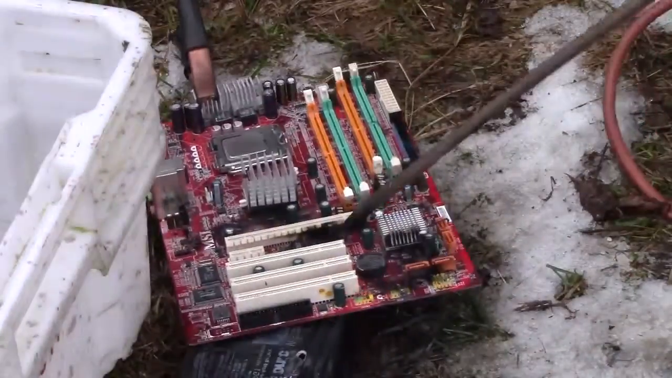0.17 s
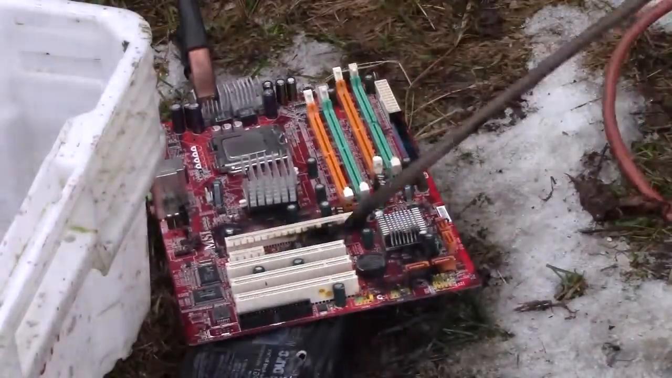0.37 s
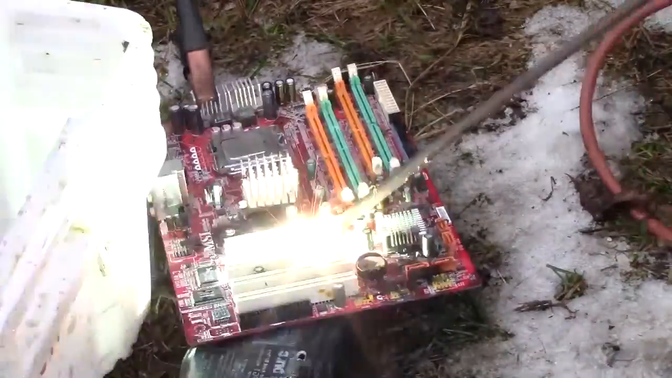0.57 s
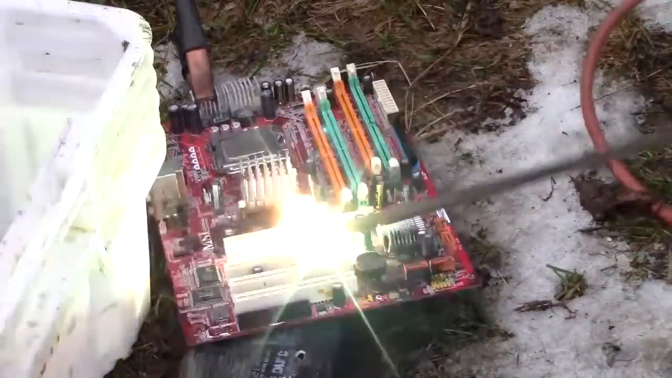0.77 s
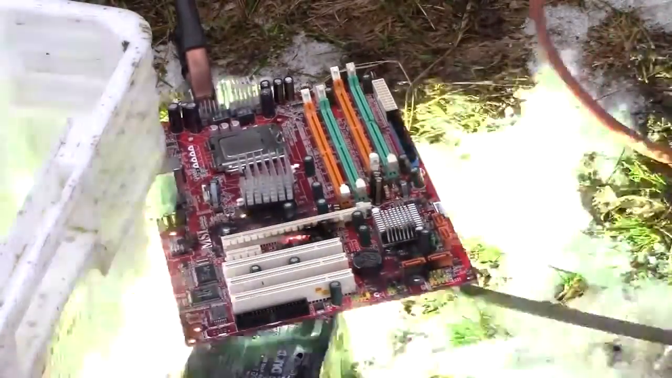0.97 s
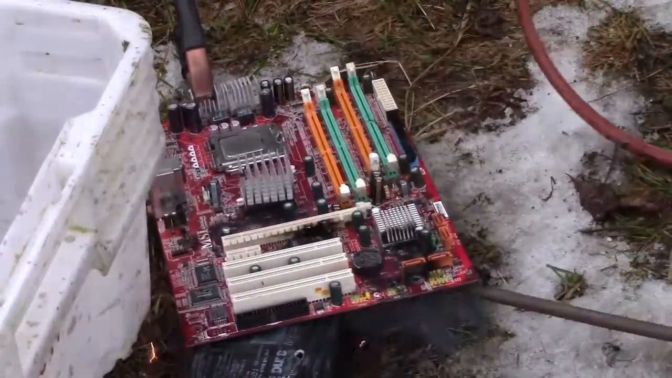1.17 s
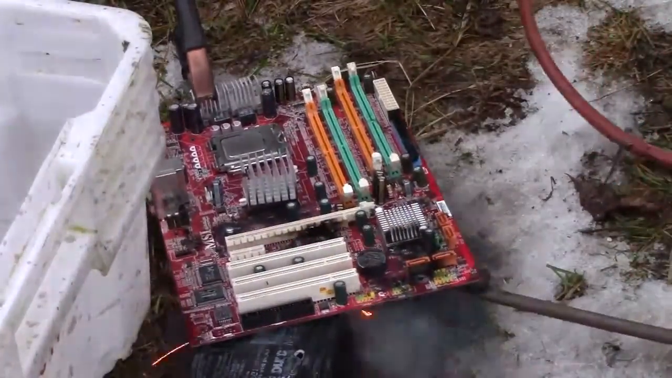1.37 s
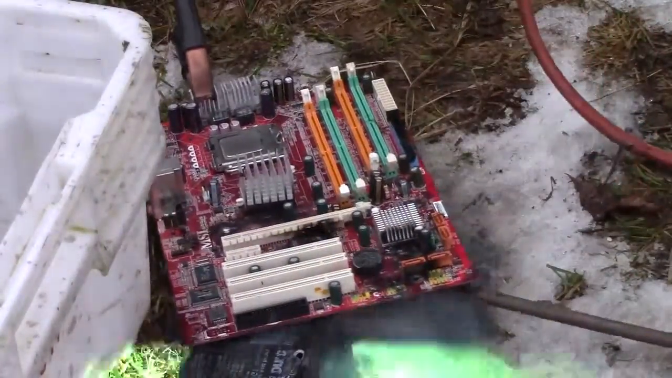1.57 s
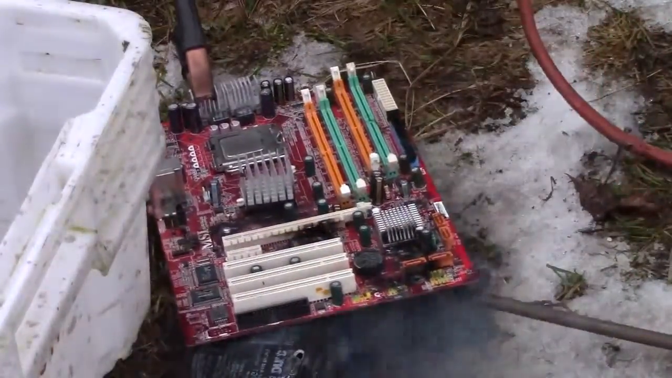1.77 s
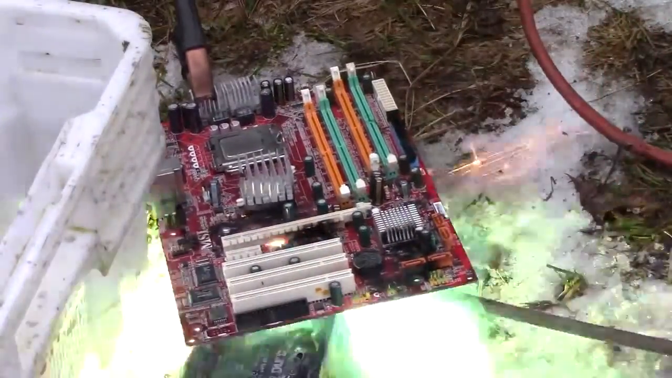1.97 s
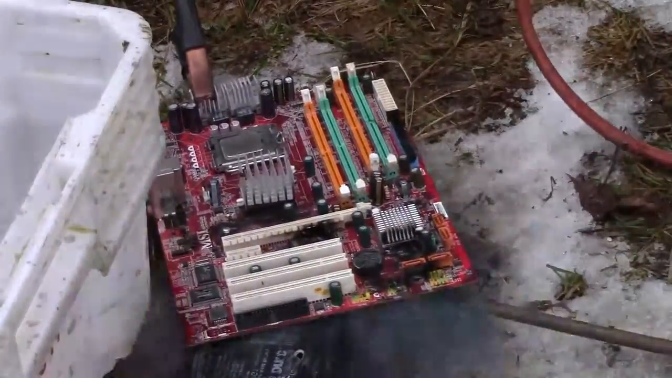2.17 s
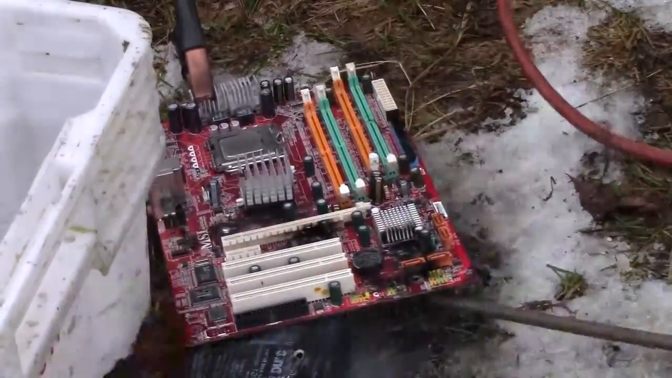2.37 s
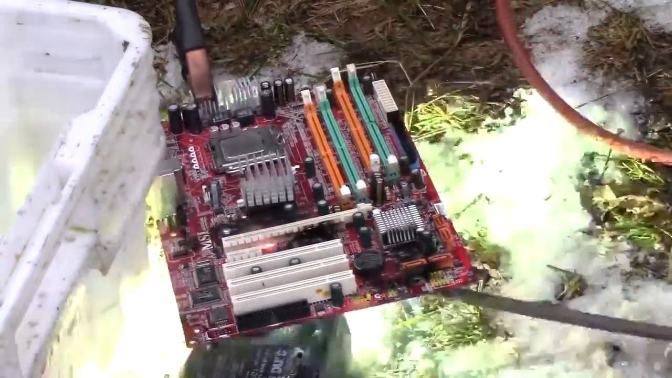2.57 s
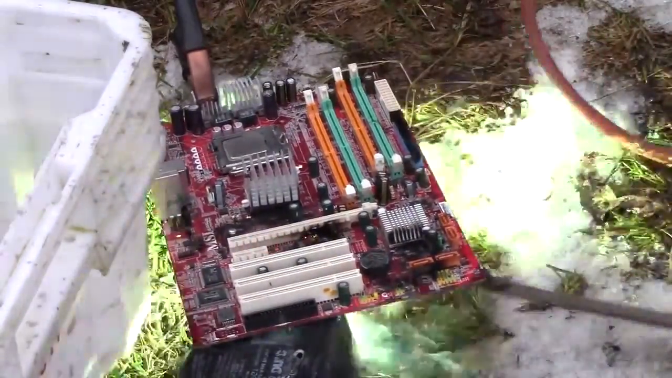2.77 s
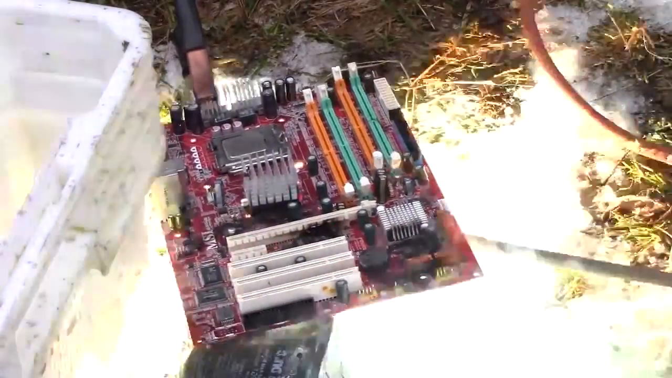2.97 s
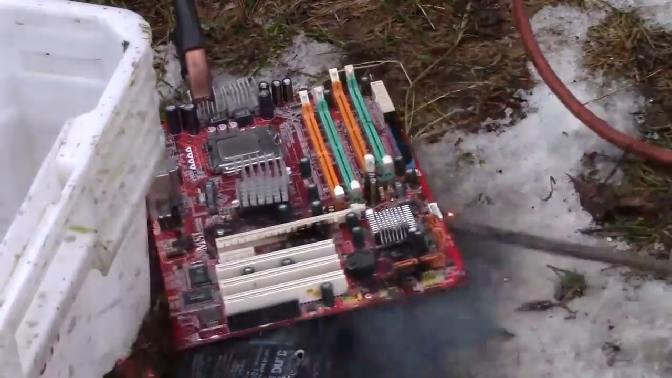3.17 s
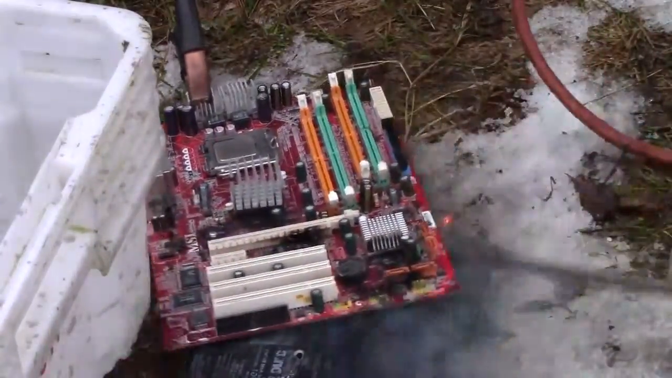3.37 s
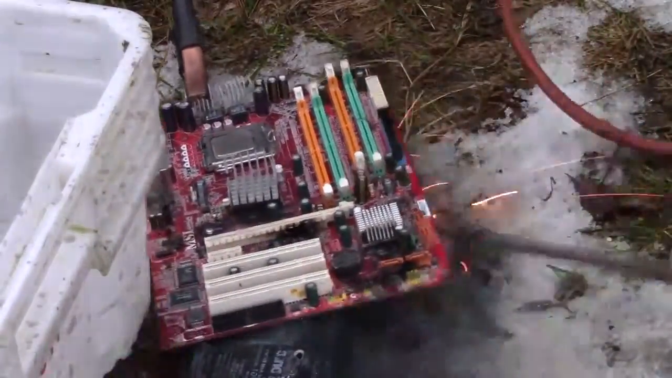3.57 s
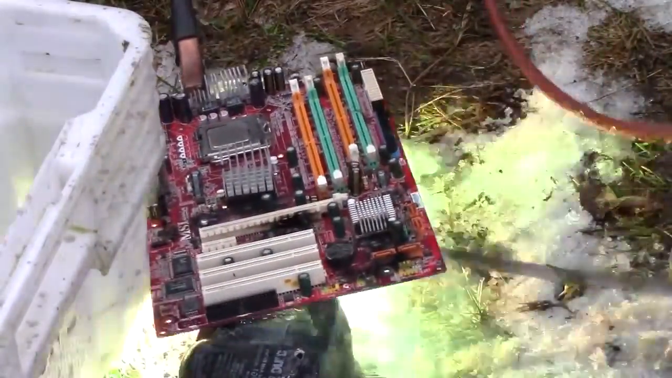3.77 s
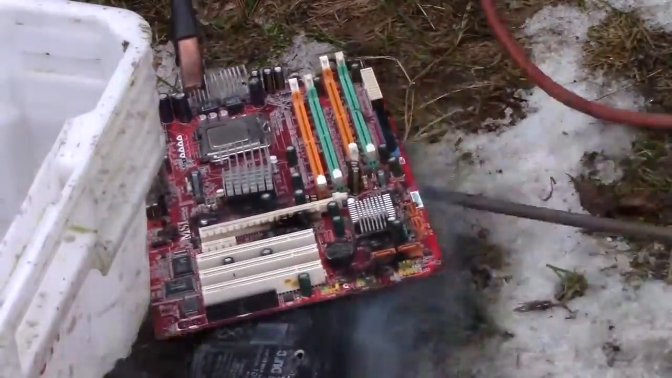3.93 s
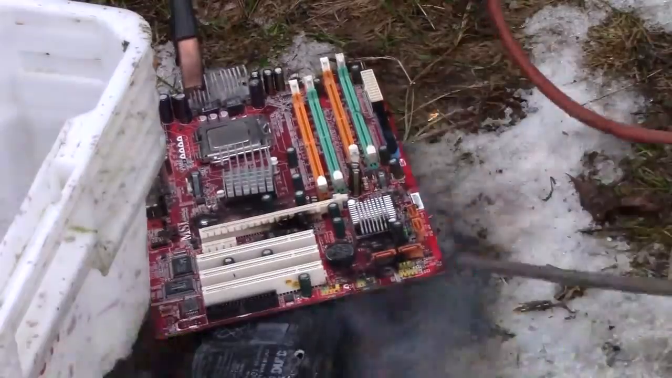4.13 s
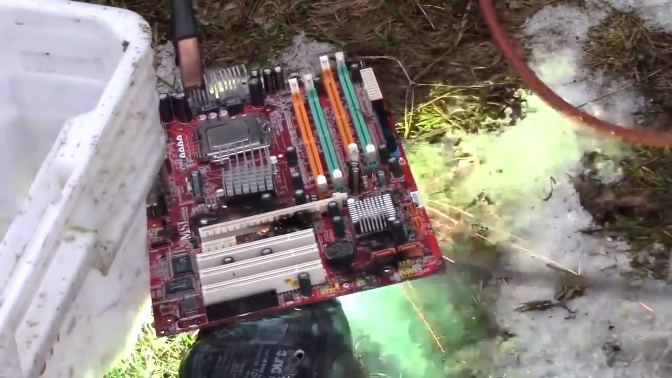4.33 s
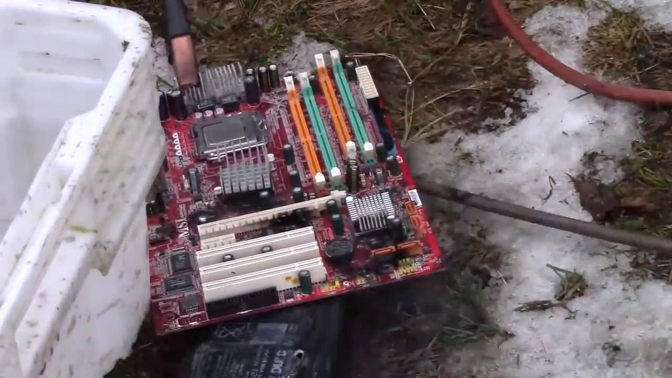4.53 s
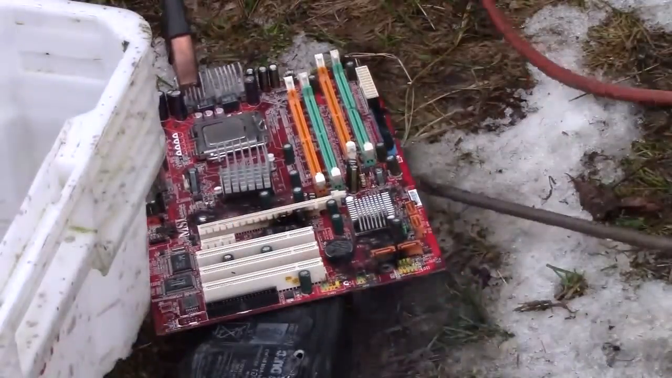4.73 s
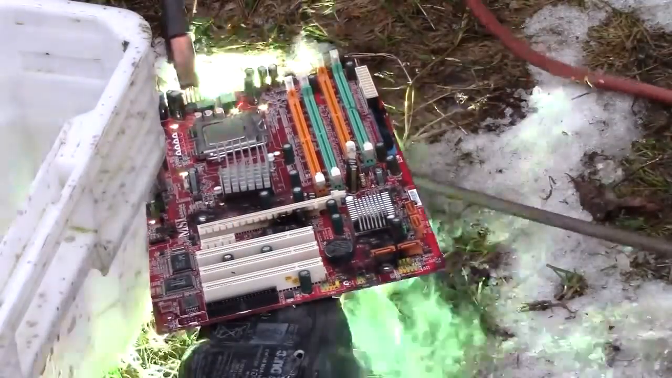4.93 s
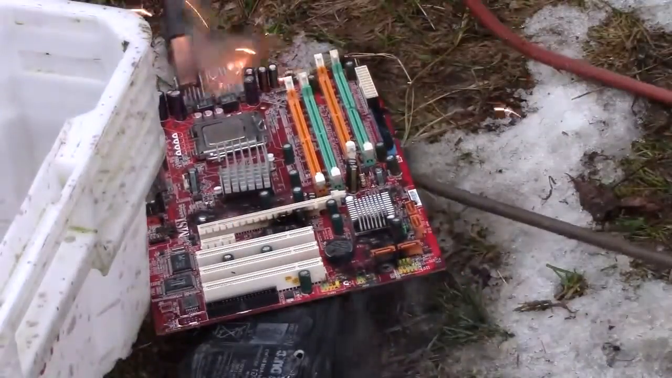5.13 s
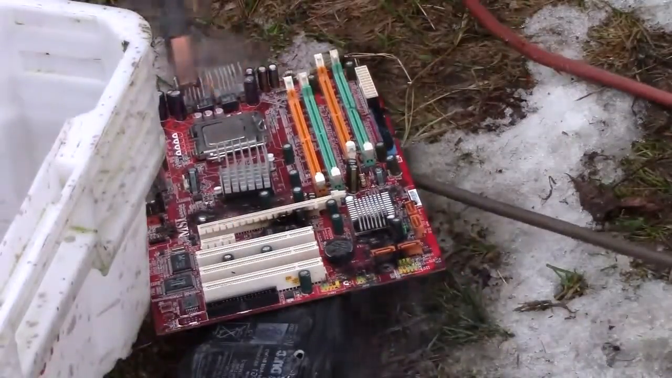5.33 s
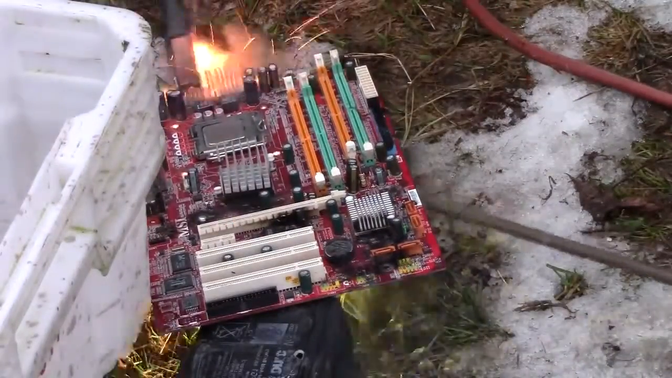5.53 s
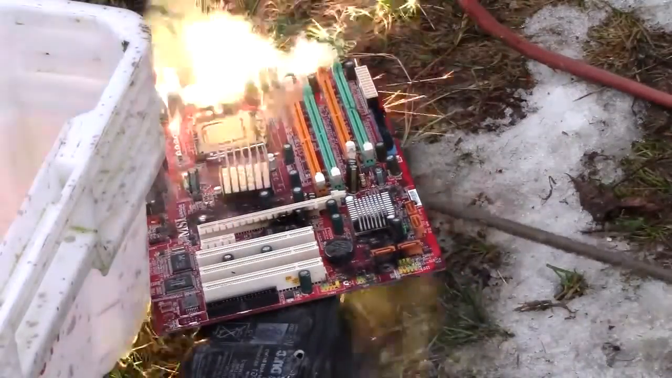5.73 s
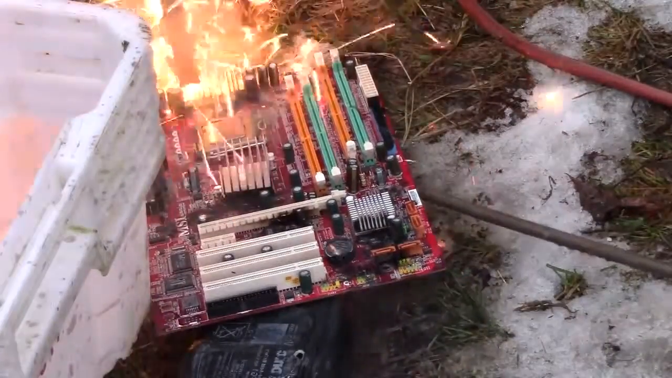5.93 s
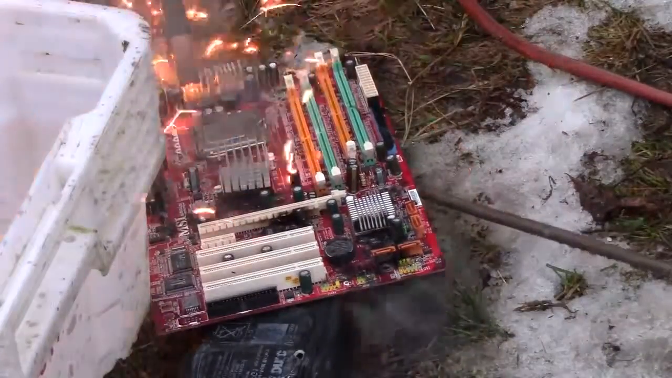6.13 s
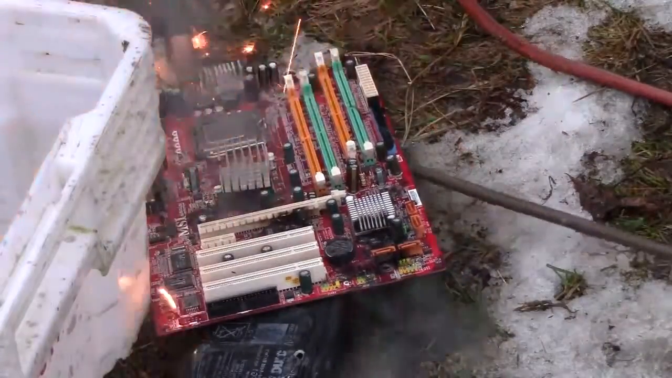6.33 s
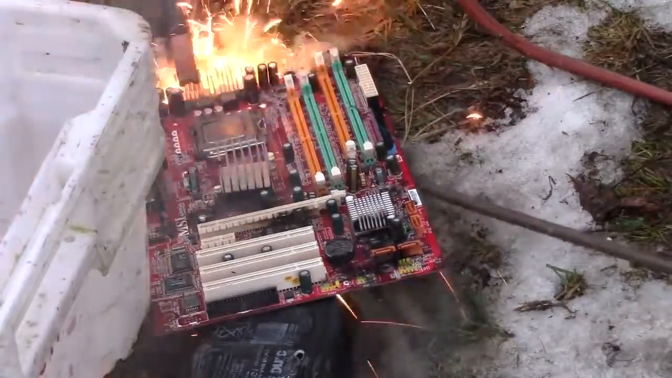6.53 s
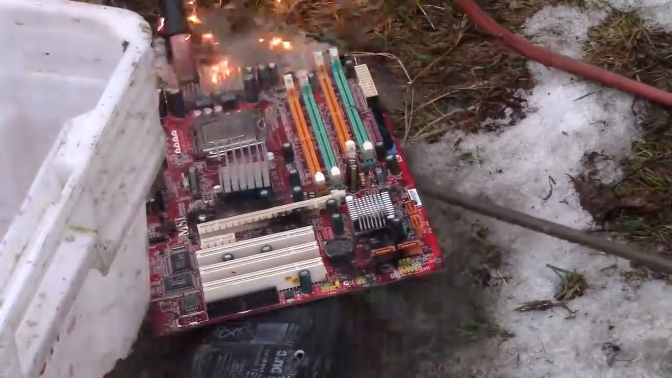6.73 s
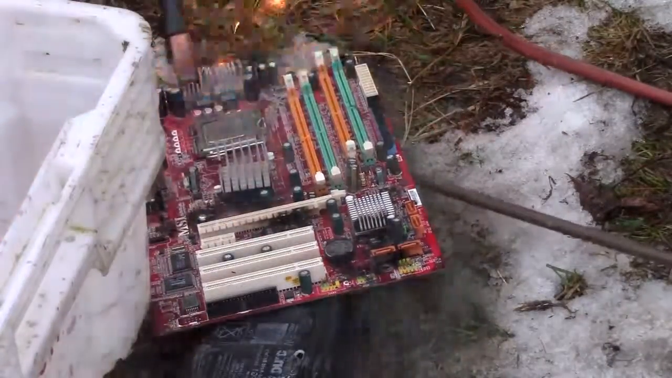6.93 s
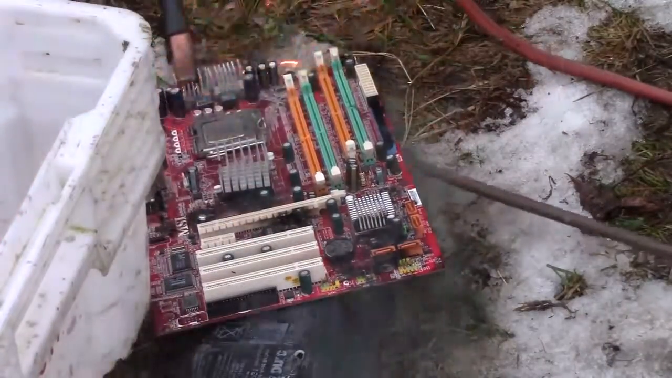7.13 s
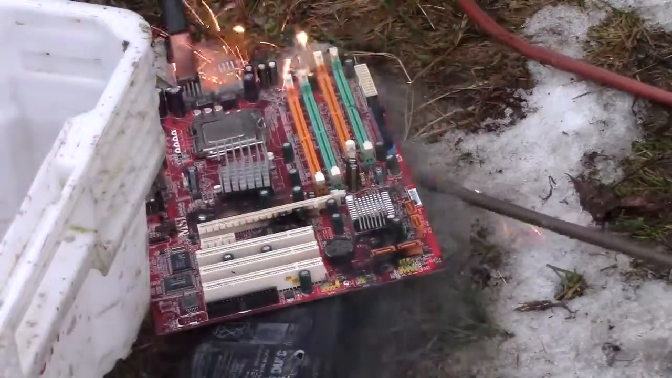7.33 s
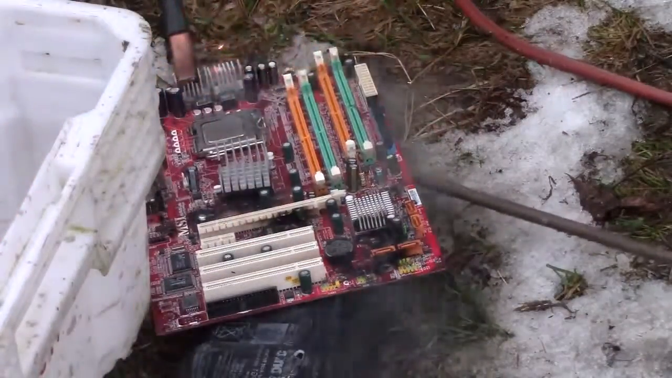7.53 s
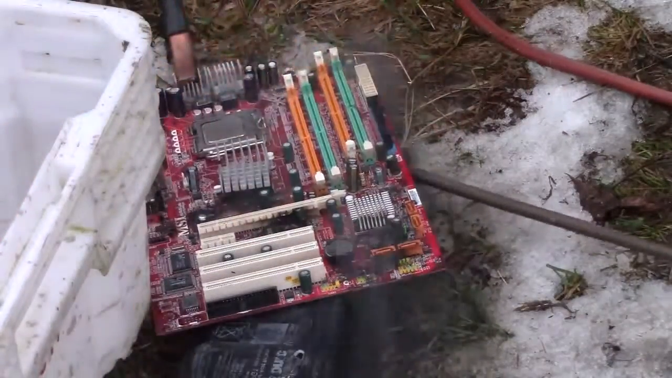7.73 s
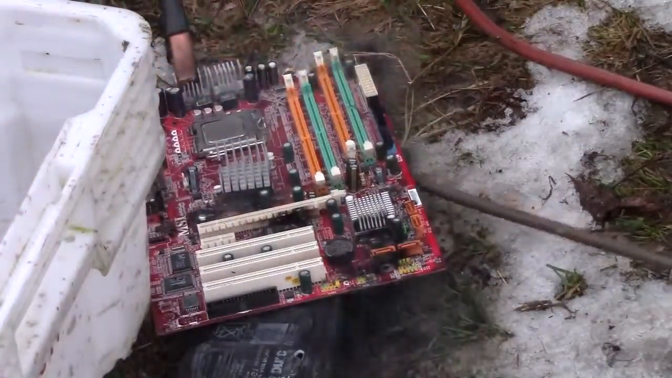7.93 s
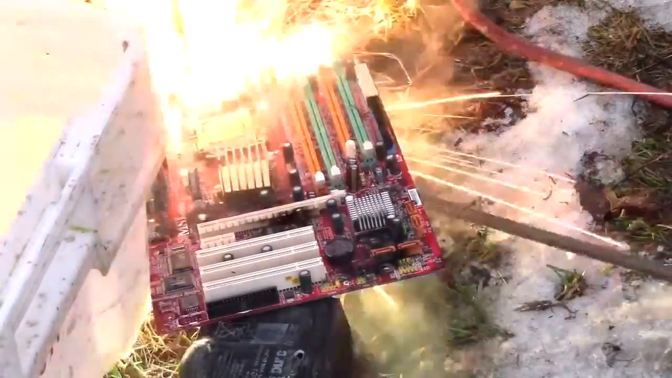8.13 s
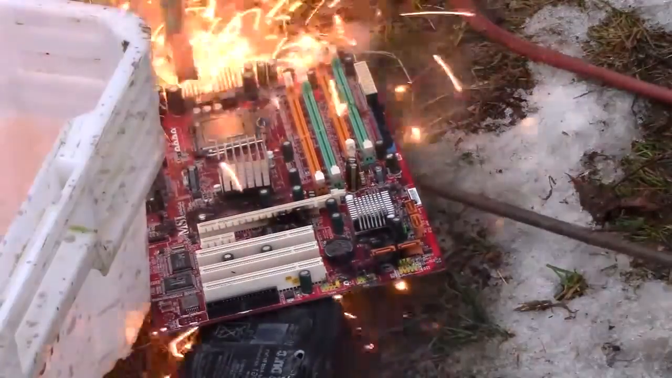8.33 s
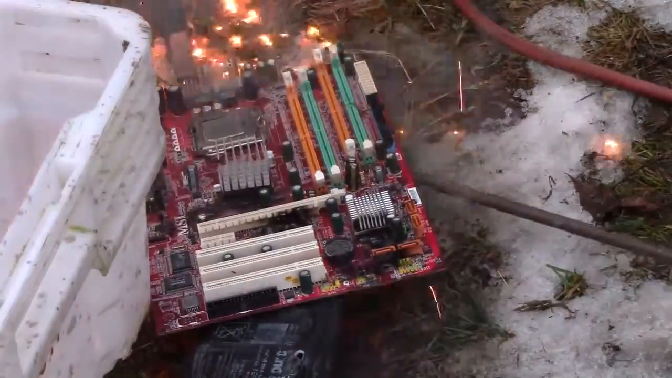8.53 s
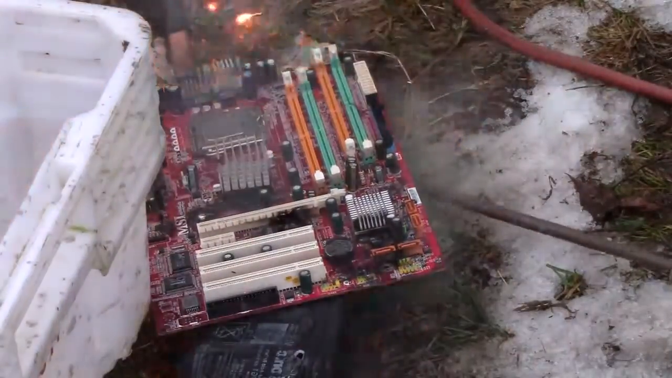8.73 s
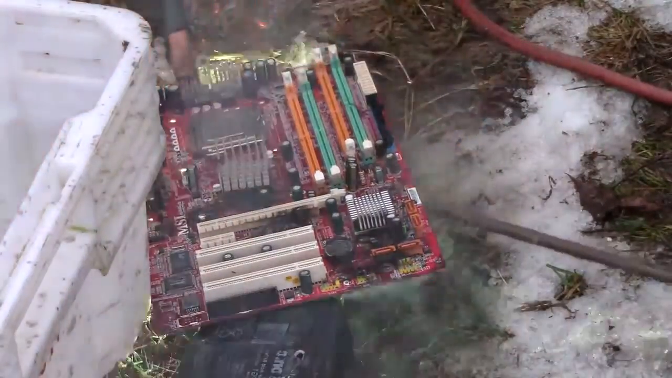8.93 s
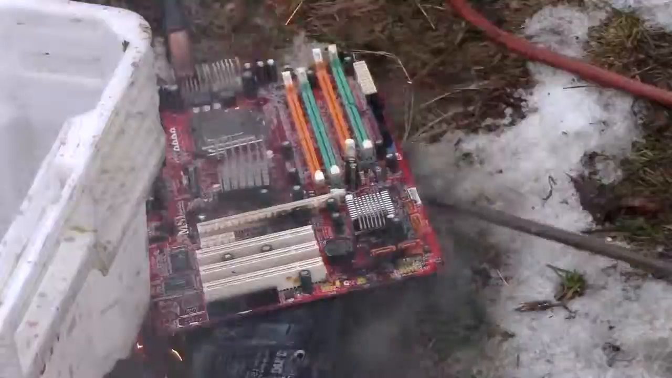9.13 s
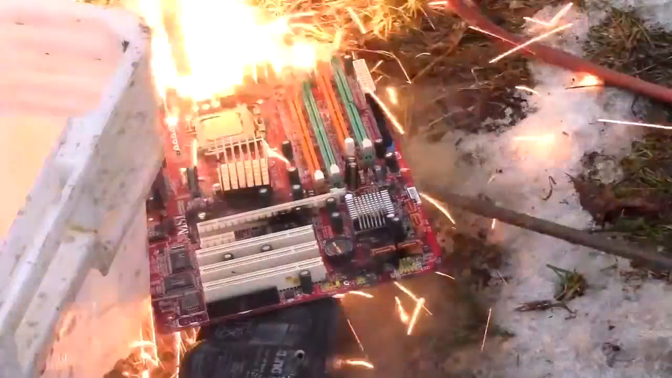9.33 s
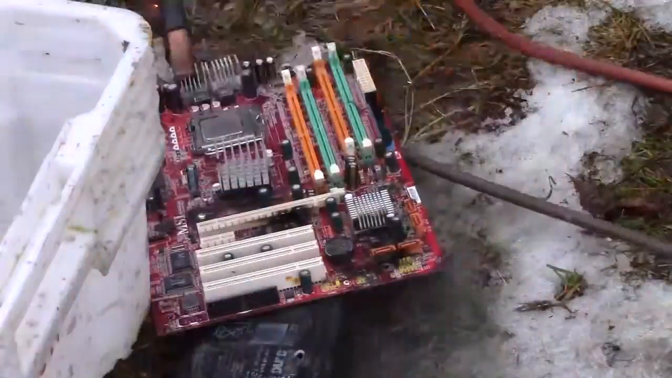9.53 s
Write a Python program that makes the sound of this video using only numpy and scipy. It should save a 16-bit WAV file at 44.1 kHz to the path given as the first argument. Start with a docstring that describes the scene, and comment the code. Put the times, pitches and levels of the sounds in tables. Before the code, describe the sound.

Electrical arcing on a circuit board, miked close in an open yard. Dry explosive cracks overload the microphone, fading into sizzle; sharp zaps with a boxy, hollow ring follow, rapid and uneven. Around halfway a contact fries, then harsh, longer crackling burns erupt with a low whoomph. Later clusters are sparser, with faint smouldering and ticking between and short diffuse reflections after each strike.

```python
"""Outdoor yard: a welding rod is jabbed at a circuit board, close to the microphone.
Contacts on top blow apart first: noise bursts with a shove of air, loud enough to clip.
Then short arcs strike under the board and later at its far edge: a thump, then a burn of crackle and hiss.
Random clicks, filtered, make sizzle, spits and frying; noise that follows the sparks makes the yard's echoes.
"""
import sys
import numpy as np
from scipy import signal
from scipy.fft import rfft, irfft
from scipy.io import wavfile
from scipy.ndimage import uniform_filter1d

SR = 44100
rng = np.random.default_rng(int(sys.argv[2]) if len(sys.argv) > 2 else 0)


def unload_audio(sound):
    """Save the sound as a 16-bit wav file, at the path given as the first command line argument."""
    columns = np.transpose(np.atleast_2d(sound))
    # keep every value between -1 and 1, then stretch to whole-number steps
    steps = np.round(np.clip(columns, -1, 1) * 32767)
    wavfile.write(sys.argv[1], SR, steps.astype(np.int16))


N = 422919
T = np.arange(N) / SR
ROD_MOVES_S = 4.7  # from under the board to its edge


def undb(db):
    """Decibels to gain."""
    return 10 ** (np.asarray(db) / 20)


def unit(x):
    """Scale to rms 1."""
    return x / np.sqrt(np.mean(x ** 2) + 1e-18)


def peak_unit(x):
    """Scale to peak 1."""
    return x / np.abs(x).max()


def add(out, start_s, x):
    """Mix x into out from start_s on."""
    i = max(int(start_s * SR), 0)
    out[i:i + len(x)] += x[:N - i]


def curve(points, at_s):
    """Interpolate a (time, value) table."""
    return np.interp(at_s, *np.transpose(points))


def during(spans):
    """1 inside the spans, 0 outside, with soft edges."""
    gate = sum(1. * ((T > start) & (T < end)) for start, end in spans)
    return uniform_filter1d(gate, size=300)


def cut(x, hz, kind, order=4):
    """Butterworth low-pass or high-pass."""
    sos = signal.butter(order, min(hz, .45 * SR), kind, fs=SR, output="sos")
    return signal.sosfilt(sos, x)


def band(x, hz, q):
    """One broad resonance, gain 1 at its centre."""
    return signal.lfilter(*signal.iirpeak(hz, q, fs=SR), x)


def convolve(x, response):
    """Pass x through a response, keeping its length."""
    return signal.fftconvolve(x, response)[:len(x)]


def colour(x, points, size=1024):
    """Minimum-phase filter through (Hz, dB) points."""
    hz, db = np.transpose(points)
    bins_hz = np.arange(size // 2 + 1) * SR / size
    log_gain = np.interp(np.log(bins_hz + 1), np.log(hz), np.log(undb(db)))
    # folding the cepstrum makes the filter causal
    cepstrum = irfft(log_gain)[:size // 2]
    cepstrum[1:] *= 2
    return convolve(x, irfft(np.exp(rfft(cepstrum, size))))


def crackle(n, rate_hz, spread_db):
    """Random clicks of either sign: mostly small, a few big."""
    sizes = undb(spread_db * np.minimum(rng.exponential(size=n), 4))
    return (rng.random(n) < rate_hz / SR) * sizes * rng.choice([-1, 1], n)


def flicker(n, rate_hz, depth_db):
    """A gain that wanders at the given rate."""
    steps = np.arange(n) * rate_hz / SR
    return undb(depth_db * np.interp(steps, np.arange(n), rng.standard_normal(n)))


def thump(t, hz, cycles):
    """A pressure pulse: a dip, a peak and a second dip."""
    return np.cos(2 * np.pi * hz * t) * np.exp(-(hz * t / cycles) ** 2)


def burn(t, length_s, tone, rate_hz, spread_db, flutter_db, strike_db):
    """Hopping arc root: dense pops roar, fluttering plasma hisses; both about rms 1 over the burn."""
    n = len(t)
    alight = np.clip(t / 0.00085 + 1, 0, 1) * np.exp(-np.maximum(t - length_s, 0) / 0.0023)
    strike = 1 + undb(strike_db) * np.exp(-(t / 0.0013) ** 2)
    flutter = alight * flicker(n, 330, flutter_db)
    root_pops = crackle(n, rate_hz, spread_db) * flutter * np.clip(t / 0.00039, 0, 1)
    roar = cut(colour(root_pops, tone), 2100, "low")
    plasma = crackle(n, 12000, 5.5) * flutter * strike
    hiss = cut(colour(plasma, tone), 2000, "high")
    return [v / np.sqrt(np.sum(v ** 2) / (length_s * SR) + 1e-18) for v in (roar, hiss)]


# outdoor air: (frequency [Hz], gain [dB])
AIR_TONE = [(270, -5.5), (900, -6.5), (3000, -15), (15000, -29)]


def air():
    """Steady outdoor noise, slowly wavering."""
    noise = cut(colour(rng.standard_normal(N), AIR_TONE), 130, "high", order=2)
    return undb(-73) * unit(noise) * flicker(N, 1, 1)


# heat in units of one strike under the board
START_HEAT, CRACK_HEAT, EDGE_HEAT, COOL_S = 6.6, 1.3, 0.24, 0.49


def heat():
    """Every crack and arc warms the board, which cools exponentially."""
    doses = [(0, START_HEAT)]
    doses += [(s, CRACK_HEAT) for s, *_ in CRACKS]
    doses += [(s, 1 if s < ROD_MOVES_S else EDGE_HEAT) for s, *_ in ARCS]
    out, cooling = np.zeros(N), np.exp(-T / COOL_S)
    for s, dose in doses:
        add(out, s, dose * cooling)
    return out


# boiling resin: (frequency [Hz], gain [dB])
RESIN_TONE = [(80, -28), (260, -4.5), (550, -4), (1700, -9.5), (2500, -17.5), (9000, -25), (15000, -38)]
# rod lifted, at most tapping the board: (start [s], end [s]); a row ending before its start does nothing
LIFTS = [(1.17, 1.9), (3.26, 3)]
# smouldering of scorched resin: (time [s], level [dB])
SMOULDER = [(1.9, -77), (5.3, -61), (6.2, -70.5), (8.1, -82), (8.65, -68), (9.5, -65)]
COLD_DB, DB_PER_HEAT, LIFT_DB = -86.5, 6, -12


def sizzle():
    """Scorched resin boils louder with heat, softer with the rod lifted; it also simmers and ticks."""
    hot = undb(COLD_DB + DB_PER_HEAT * heat() + LIFT_DB * during(LIFTS))
    boil = unit(colour(crackle(N, 5000, 3.5), RESIN_TONE)) * flicker(N, 40, 3)
    simmer = unit(colour(crackle(N, 7800, 2.0), RESIN_TONE)) * flicker(N, 20, 1.3)
    simmer += .35 * unit(pops(crackle(N, 14, 4)))
    return hot * boil + undb(curve(SMOULDER, T)) * simmer


# contacts blowing apart: (time [s], blast level [dB], decay [s])
CRACKS = [(0.0192, 4, 0.0027), (0.3079, 11.5, 0.0014), (0.3206, -4, 0.001), (0.3826, 7, 0.0019),
          (0.5257, 9.5, 0.0015), (0.6048, -9, 0.0033), (0.6843, 8.5, 0.0023), (0.8869, 3, 0.0022),
          (0.891, -4.5, 0.0014), (0.902, -3.5, 0.002)]
# blast in the open: (frequency [Hz], gain [dB])
BLAST_TONE = [(40, -16.5), (400, -1), (880, -3), (1230, 4), (1700, -1.5), (3600, -2.5), (6000, -9.5),
              (8500, -7.5), (15000, -17.5)]


def cracks():
    """A metal bridge boils away at once: a shove of air, a violent burst, a brief droplet spray."""
    out, t = np.zeros(N), T[:int(.08 * SR)]
    for s, db, decay_s in CRACKS:
        burst = rng.standard_normal(len(t)) * np.exp(-t / decay_s)
        spray = undb(-29) * unit(crackle(len(t), 1200, 3.4)) * np.exp(-t / 0.036)
        shove = undb(-14.5) * thump(t - .002, 410, cycles=0.47)
        blast = undb(4.5) * colour(burst + spray, BLAST_TONE)
        add(out, s, undb(db) * (blast + shove))
    return out


def patch(hold_s, t60_s):
    """Envelope of an echo patch: swells, holds, dies away."""
    t = T[:SR]
    return np.clip(t / .004, 0, 1) * undb(-60 * np.maximum(t - hold_s, 0) / t60_s)


def slap(x, wet_db, hold_s, t60_s, dull_hz):
    """Nearby things return the cracks as a dense, thin-bodied train of echoes."""
    response = crackle(SR, 9000, 2) * patch(hold_s, t60_s)
    response = cut(response, dull_hz, "low", order=1)
    response = cut(response, 240, "high", order=2)
    return undb(wet_db) * convolve(x, response / np.linalg.norm(response))


# arcs left standing after a crack: (time [s], length [s], level [dB], ring [Hz])
FLAMES = [(0.317, 0.056, -28.5, 622), (0.542, 0.046, -26.5, 583.5)]


def flames():
    """A standing arc: a rough roar with a hollow ring."""
    out = np.zeros(N)
    for s, length_s, db, ring_hz in FLAMES:
        t = T[:int((length_s + .025) * SR)]
        roar, hiss = burn(t, length_s, BLAST_TONE, rate_hz=2000, spread_db=3,
                          flutter_db=3.5, strike_db=-10)
        ring = unit(band(roar, ring_hz, 3))
        add(out, s, undb(db) * (ring + .25 * roar + 0.35 * hiss))
    return out


def yard(x, tone, wet_db, hold_s, t60_s, grain_db, far_db=-60):
    """Nearby things scatter sparks into countless echoes, far walls add a faint tail: noise shaped by power."""
    far = undb(far_db - 60 * T[:SR] / 1.2)
    spread = patch(hold_s, t60_s) ** 2 + far ** 2
    power = np.maximum(convolve(x ** 2, spread / spread.sum()), 0)
    grains = unit(colour(crackle(N, 7000, grain_db), tone))
    return undb(wet_db) * np.sqrt(power) * grains


# hollow under the board: [Hz]
HOLLOW_HZ = [560, 674]
HOLLOW_Q, HOLLOW_DB = 18, 5.5


def hollow(body):
    """The hollow under the board rings with the echoes until the rod moves to the edge."""
    ring = sum(band(body, hz, HOLLOW_Q) for hz in HOLLOW_HZ)
    return undb(HOLLOW_DB) * during([(0, ROD_MOVES_S)]) * ring


# hollow body of the echoes: (frequency [Hz], gain [dB])
BODY_TONE = [(150, -22.5), (260, -10.5), (600, -1.5), (800, -7.5), (1150, -11.5), (4000, -39)]
# bright scatter of the echoes: (frequency [Hz], gain [dB])
SCATTER_TONE = [(200, -10), (400, 1.5), (8000, -6.5), (15000, -24)]


def echoes(burning, blasts):
    """The yard's return: dull body with its ring, bright scatter, slap of the cracks."""
    body = yard(cut(burning, 730, "low"), BODY_TONE, wet_db=-20.5, hold_s=0.031, t60_s=0.14,
                grain_db=1, far_db=-28.5)
    scatter = yard(cut(burning, 1700, "high"), SCATTER_TONE, wet_db=-23, hold_s=0.028, t60_s=0.12,
                   grain_db=2.5)
    slaps = slap(blasts, wet_db=-16.5, hold_s=0.037, t60_s=0.094, dull_hz=4326)
    return body + hollow(body) + scatter + slaps


# arc at the board's edge: (frequency [Hz], gain [dB])
EDGE_TONE = [(40, -29), (200, -8), (600, 2), (1100, 4), (1650, 1), (2400, -15.5), (3100, -15),
             (5800, -27.5), (8000, -22.5), (15000, -38)]


def pops(clicks):
    """Tiny sparks, heard partly off the board and partly in the open."""
    return colour(clicks, EDGE_TONE) + undb(-11.5) * colour(clicks, BLAST_TONE)


# small spits and touches of the rod: (time [s], peak [dB])
SPITS = [(0.461, -22.5), (0.51, -25), (0.652, -17), (.679, -9), (2.775, -20.5), (2.808, -19), (2.837, -21),
         (3.040, -19), (4.123, -10.5), (4.187, -21), (4.278, -9.5), (4.372, -13), (4.386, -22.5),
         (4.425, -21.5), (4.486, -14.5), (4.790, -24), (4.808, -26.5), (5.037, -8.5), (9.141, -14),
         (9.179, -19.5), (9.2, -19)]


def spits():
    """Tiny arcs that die within milliseconds."""
    out, t = np.zeros(N), T[:int(.03 * SR)]
    for s, db in SPITS:
        spit = pops(crackle(len(t), 8000, 1.5) * np.exp(-t / 0.0045))
        add(out, s, undb(db) * peak_unit(spit))
    return out


def bounce(x, share):
    """A reflection off a nearby part; its path, and so the colour, differs per strike."""
    lag = int(rng.uniform(.0003, .0016) * SR)
    reflection = np.pad(x, (lag, 0))[:len(x)]
    return (x + share * reflection) / np.hypot(1, share)


# arcs: (time [s], thump level [dB], burn length [s], burn level [dB])
ARCS = [(1.070, -0.5, 0.016, -17.5), (1.123, -1.5, 0.01, -27), (1.3775, -5.5, 0.014, -25),
        (1.7005, -7, 0.0091, -21), (1.7453, -5.5, 0.0083, -22.5), (2.045, -2.5, 0.0066, -20.5),
        (2.0954, -4, 0.011, -18.5), (2.179, -1.5, 0.0089, -22), (2.3602, -3, 0.014, -20.5),
        (2.3922, -5.5, 0.01, -25), (2.444, -7, 0.0087, -21.5), (2.5957, -2.5, 0.0015, -17),
        (2.677, 3.5, 0.0094, -23.5), (2.728, -9, 0.0027, -19), (2.854, -0.5, 0.0096, -17),
        (2.915, -4.5, 0.014, -15.5), (2.938, -7.5, 0.011, -23), (3.0803, -3.5, 0.005, -16.5),
        (3.143, -6.5, 0.016, -27.5), (3.207, -6, 0.0065, -21), (3.330, -8.5, 0.0028, -18),
        (3.4343, -13, 0.0044, -15.5), (3.568, -2.5, 0.0026, -18), (3.5926, -6, 0.0054, -21),
        (3.760, -2.5, 0.003, -17.5), (3.809, -8, 0.012, -26), (3.888, -4, 0.0038, -16.5),
        (3.976, -7, 0.0011, -14), (3.997, -10, 0.0003, -10), (4.099, -5, 0.008, -23.5),
        (4.2654, -6, 0.0076, -20.5), (4.348, -7, 0.0033, -18.5), (4.449, 0, 0.0061, -27),
        (4.471, -2.5, 0.009, -18.5), (4.539, -12.5, 0.0084, -20.5), (4.989, 0.5, 0.004, -14),
        (5.0455, 5, 0.043, -14.5), (5.135, 1.5, 0.033, -16), (5.551, 1, 0.022, -14), (5.586, 2, 0.046, -18),
        (5.656, -1, 0.017, -16), (5.765, -1.5, 0.0053, -11), (5.826, -3, 0.059, -22.5),
        (6.530, 3, 0.046, -25), (6.6245, -3, 0.0055, -24.5), (6.639, -5.5, 0.0018, -20),
        (6.838, -2, 0.0039, -26.5), (7.0833, -4, 0.0095, -21), (7.339, 2.5, 0.011, -22),
        (7.371, -9, 0.007, -22), (8.1576, -3.5, 0.099, -23.5), (8.239, -7, 0.0078, -19),
        (8.296, -1, 0.0049, -18), (8.329, 2, 0.022, -21.5), (8.904, 1, 0.0039, -24),
        (8.999, -2.5, 0.0051, -12), (9.018, -6, 0.0081, -15), (9.080, -7, 0.016, -23),
        (9.103, -15, 0.012, -18.5), (9.153, -9, 0.014, -19.5), (9.274, -5, 0.052, -25.5),
        (9.336, -21, 0.096, -25)]
# arc under the board: (frequency [Hz], gain [dB])
UNDER_TONE = [(40, -29.5), (200, -11.5), (650, 5.5), (850, -9), (1200, -2.5), (2000, -14.5), (2480, -26.5),
              (3200, -14.5), (4700, -16.5), (6200, -22.5), (8600, -14.5), (15000, -33)]
# thump under the board: (frequency [Hz], gain [dB])
THUMP_TONE = [(50, -25.5), (150, -13.5), (400, -2), (630, 3.5), (850, -7), (1200, -2.5), (2400, -24.5),
              (15000, -51)]
# snap at the edge: (frequency [Hz], gain [dB])
SNAP_TONE = [(200, -22.5), (650, -3.5), (1100, 4), (1600, 1), (2300, -13.5), (3100, -14.5), (4600, -29.5),
             (15000, -49)]
# ring of the gap under the board, shifting as the rod is pushed about: (time [s], pitch [Hz])
GAP = [(1.1, 3520), (1.75, 3200), (2.75, 3220), (3.1, 5400), (4.45, 3630)]
GAP_Q, GAP_DB = 5.5, 1
PITCH_SPREAD = 0.06  # strike to strike, log units
LEAD_S = .0005  # burn fades in before the strike
# hiss level of an ordinary burn; slope in dB per dB of stronger burn
ORDINARY_BURN_DB = -20
UNDER_HISS_DB, UNDER_HISS_SLOPE = -20, 0.42
EDGE_HISS_DB, EDGE_HISS_SLOPE = -26.5, 0.39
FRESH_DB, FRESH_S = 19.5, 0.46  # extra hiss of fresh edge metal, until burnt away


def arcs():
    """A sudden thump of heated air, then a burn until the gap opens; edge burns sputter more."""
    out = np.zeros(N)
    for s, thump_db, length_s, burn_db in ARCS:
        under = s < ROD_MOVES_S
        shift = [np.exp(PITCH_SPREAD * rng.standard_normal()), 1]  # scales Hz only
        t = np.arange(int((length_s + .09) * SR)) / SR - LEAD_S
        blow_tone = np.multiply(THUMP_TONE if under else SNAP_TONE, shift)
        blow = -colour(signal.unit_impulse(len(t)), blow_tone)
        stronger_db = burn_db - ORDINARY_BURN_DB
        if under:
            roar, hiss = burn(t, length_s, np.multiply(UNDER_TONE, shift), rate_hz=6100,
                              spread_db=1.5, flutter_db=1.8, strike_db=6)
            hiss_db = UNDER_HISS_DB + UNDER_HISS_SLOPE * stronger_db
        else:
            roar, hiss = burn(t, length_s, np.multiply(EDGE_TONE, shift), rate_hz=1000,
                              spread_db=4.5, flutter_db=4.2, strike_db=-1)
            fresh_db = FRESH_DB * np.exp((ROD_MOVES_S - s) / FRESH_S)
            hiss_db = EDGE_HISS_DB + EDGE_HISS_SLOPE * stronger_db + fresh_db
        blow = undb(thump_db) * blow / blow.max()
        strike = blow + undb(burn_db) * roar + undb(hiss_db) * bounce(hiss, share=0.33)
        if under:
            strike = strike + undb(GAP_DB) * band(strike, curve(GAP, s), GAP_Q)
        add(out, s - LEAD_S, cut(strike, 70, "high", order=2))
    return out


# droplets bursting: (time [s], peak [dB])
TICKS = [(2.55, -28), (3.684, -29)]


def ticks():
    """Flying droplets of metal burst with a thin tick."""
    out, t = np.zeros(N), T[:int(.02 * SR)]
    for s, db in TICKS:
        tick = cut(rng.standard_normal(len(t)) * np.exp(-t / 0.0029), 3100, "high", order=2)
        add(out, s, undb(db) * peak_unit(tick))
    return out


# poor contact frying: (start [s], end [s], level [dB], ring [Hz])
FRYING = [(2.779, 2.863, -43.5, 1200), (4.838, 4.981, -29, 1095)]
STUTTER_HZ = 85


def frying():
    """A poor contact stutters; every stutter rings a small cavity of the board."""
    out = np.zeros(N)
    for start, end, db, ring_hz in FRYING:
        n = int((end - start) * SR)
        phase = np.cumsum(STUTTER_HZ * flicker(n, STUTTER_HZ, 3.5)) / SR % 1
        stutter = np.exp(-phase / .7) * flicker(n, STUTTER_HZ, 2.5)
        sparks = pops(crackle(n, 3500, 4) * stutter)
        add(out, start, undb(db) * unit(sparks + 2.4 * band(sparks, ring_hz, 11)))
    return out


# low thud under the loudest strike: (time [s], peak [dB], pitch [Hz])
THUD = (5.047, -15.5, 97)


def thud():
    """A low whoomph sounds under the loudest strike."""
    s, db, hz = THUD
    out, t = np.zeros(N), T[:SR // 10]
    middle_s = t.mean()
    add(out, s - middle_s, undb(db) * thump(t - middle_s, hz, cycles=0.22))
    return out


# soft gas puffs from the resin: (time [s], peak [dB])
PUFFS = [(5.335, -41), (8.815, -46)]
PUFF_S, PUFF_TOP_HZ = 0.0099, 2179


def puffs():
    """A blister of resin lets out its gas, dull and faint."""
    out, t = np.zeros(N), T[:SR // 10]
    for s, db in PUFFS:
        gas = rng.standard_normal(len(t)) * np.exp(-t / PUFF_S)
        puff = cut(colour(gas, RESIN_TONE), PUFF_TOP_HZ, "low")
        add(out, s, undb(db) * peak_unit(puff))
    return out


# sizzle and echoes dip briefly between strikes: (start [s], end [s])
DIPS = [(.997, 1.07), (2.638, 2.77), (3.482, 3.56), (3.922, 3.99)]
DIP_DB = -12.5


def scene():
    """Sparks, board and yard, heard by two microphone ports very close together."""
    blasts = cracks()
    burning = arcs() + spits() + flames() + frying()
    tails = (sizzle() + echoes(burning, blasts)) * undb(DIP_DB * during(DIPS))
    mid = burning + blasts + ticks() + puffs() + thud() + tails + air()
    side = undb(-24.5) * np.gradient(mid)  # a tiny lag between the ports, mostly in the treble
    return np.array([mid + side, mid - side])


TOP_HZ = 15600


def record(dry):
    """The loudest peaks clip, then the top is cut."""
    top_cut = signal.ellip(8, .2, 70, TOP_HZ, fs=SR, output="sos")
    return signal.sosfilt(top_cut, np.clip(dry, -.95, .95))


dry = scene()
out = record(dry)
unload_audio(out)
```